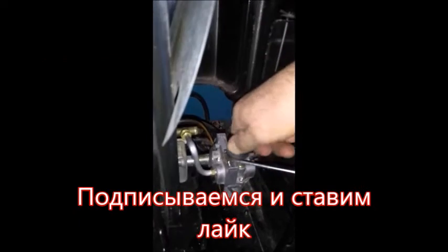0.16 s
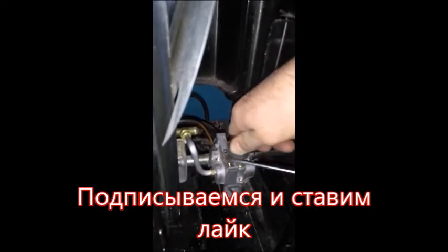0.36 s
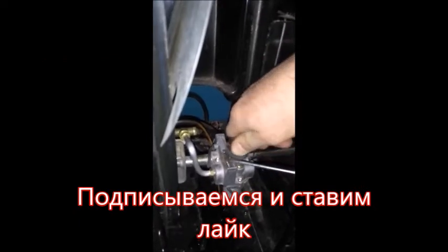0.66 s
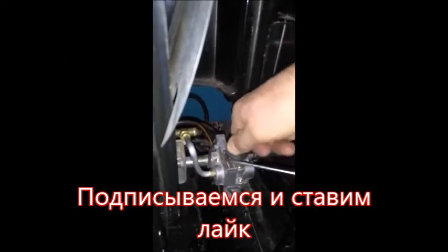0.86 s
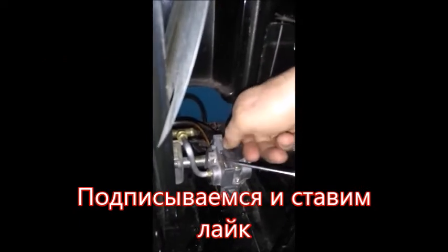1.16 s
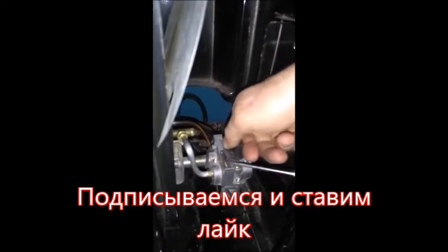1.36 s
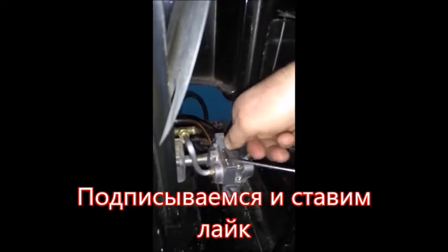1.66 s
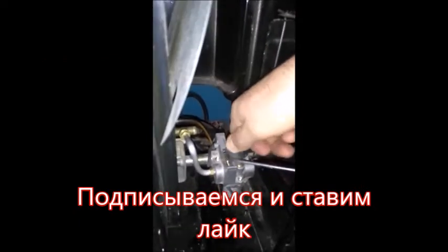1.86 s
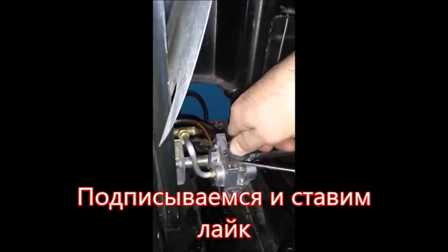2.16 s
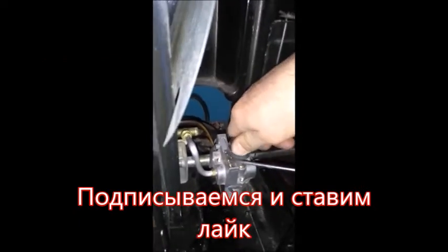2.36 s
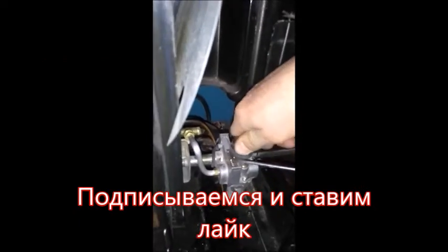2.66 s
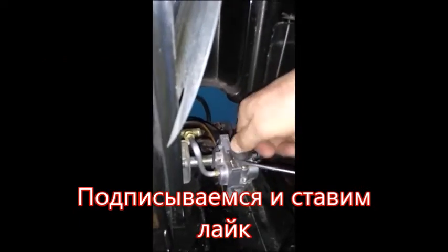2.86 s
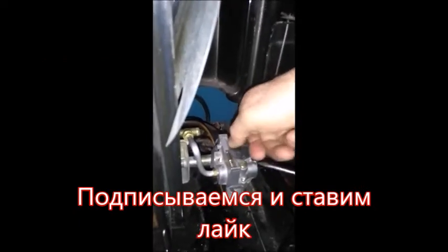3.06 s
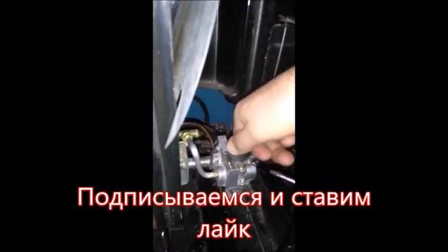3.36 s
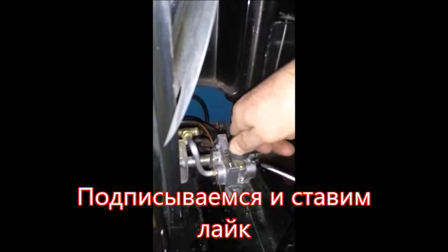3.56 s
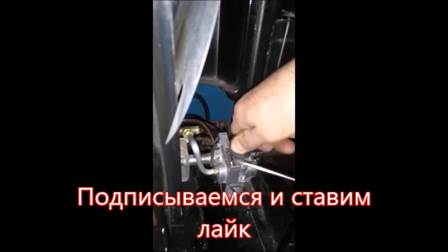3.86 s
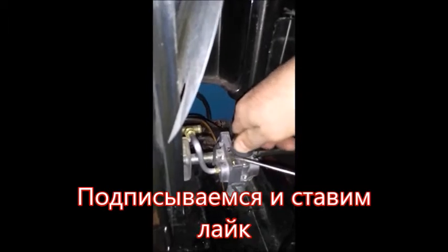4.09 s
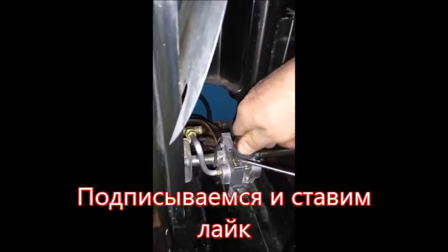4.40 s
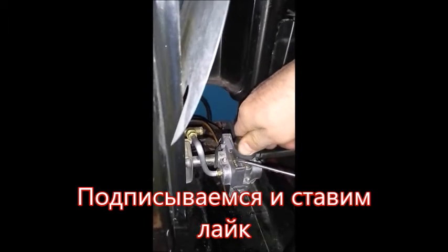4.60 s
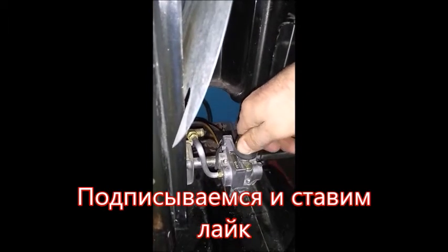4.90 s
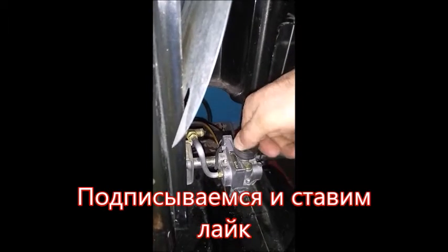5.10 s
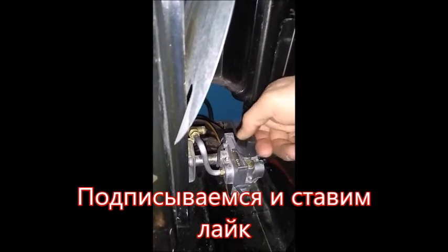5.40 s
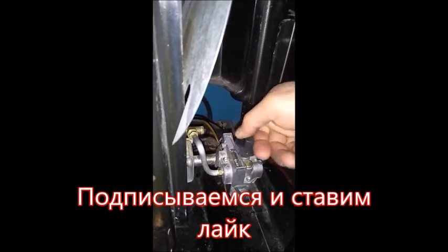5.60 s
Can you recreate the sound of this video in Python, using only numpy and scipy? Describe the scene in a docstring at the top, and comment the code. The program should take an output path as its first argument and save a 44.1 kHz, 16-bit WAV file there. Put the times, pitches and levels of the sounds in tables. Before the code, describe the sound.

A hand works a gas valve: three loud, thumping steel snaps, quieter return clicks between them, small ticks and scrapes, and faint hiss.

```python
"""The igniter of a gas valve snaps three times in a sheet-metal cabinet in a quiet room, as a thumb turns the valve.
Each snap is a swelling and fading burst of noise that rings steel parts, above a short low thump of air.
The button clicks back, the knob clacks, and fingers tick and rub: bursts and random grains excite decaying modes.
Blows also ring the cabinet; one part sings a clear tone. Held in, the valve hisses: noise with narrow resonances.
Room tone and microphone hiss are filtered noise."""
import sys
import numpy as np
from scipy import signal
from scipy.fft import rfft, irfft
from scipy.io import wavfile

SR = 44100
rng = np.random.default_rng(int(sys.argv[2]) if len(sys.argv) > 2 else 0)


def pcm_store(signal):
    """Save signal as 16-bit PCM."""
    levels = np.round(np.clip(np.atleast_2d(signal), -1, 1) * 32767)
    wavfile.write(sys.argv[1], SR, levels.astype(np.int16).T)


N = 253134

# Levels in the tables are relative: mixing gains and filters follow.
# Hammer snaps. Each row: blow in s, rattle in dB, blow into the cabinet in dB, thump in dB,
# swell of the rattle in s, fade t60 in s.
SNAPS = [(0.588, -11, -30.5, -9.5, 0.033, 0.058), (2.3954, -9, -28, -3, 0.029, 0.06),
         (4.3367, -11, -30, -6, 0.022, 0.081)]
# Button clicking back. Each row: blow in s, rattle in dB, blow into the cabinet in dB,
# swell of the rattle in s, fade t60 in s.
BUTTON_RETURNS = [(1.395, -19, -50.5, 0.012, 0.045), (3.123, -19.5, -49.5, 0.014, 0.0483)]
# Knob let go against its stop. Each row: blow in s, rattle in dB, blow into the cabinet in dB,
# swell in s, fade t60 in s.
KNOB_LET_GO = [(4.9953, -22, -36.5, 0.016, 0.16)]
# Small ticks of finger and parts. Each row: blow in s, bright level in dB, blow into the cabinet in dB,
# centre of the bright band in Hz, fade t60 in s.
TICKS = [(0.0638, -39, -73.5, 7600, 0.045), (0.1193, -46.5, -74.5, 6200, 0.038),
         (1.2944, -31, -70.5, 1620, 0.11), (1.5274, -53, -67, 1860, 0.064),
         (1.6177, -33.5, -71, 8560, 0.12), (1.9589, -35.5, -74, 7900, 0.022),
         (3.2922, -24, -49.5, 2337, 0.11), (3.3374, -39, -76, 10500, 0.068),
         (3.4207, -42.5, -66, 2280, 0.048), (3.565, -47.5, -51.5, 5200, 0.045),
         (3.6375, -41, -49.5, 2340, 0.053), (3.8878, -29, -55, 10300, 0.088),
         (4.2145, -33.5, -65, 8800, 0.077), (4.2577, -42, -84, 7040, 0.21), (5.7094, -40.5, -65, 1878, .05)]
# Brief narrow flares of the hiss near 5.9 kHz. Each row: peak in s, bright level in dB, blow into the cabinet
# in dB, # centre of the bright band in Hz, fade t60 in s.
HISS_FLARES = [(1.2100, -35, -66.5, 5930, 0.037), (2.8760, -31.5, -64.5, 5830, 0.073),
               (4.726, -33.5, -70, 5840, 0.13)]
# Strokes of the fingers rubbing and turning the knob. Each row: start in s, length in s, dull level in dB,
# bright level in dB, low panel level in dB.
RUBS = [(-.015, 0.013, -60.5, -53, -88), (0.073, 0.03, -62.5, -57, -69), (1.122, 0.1, -55.5, -83.5, -81),
        (1.187, 0.058, -52.5, -82, -60.5), (1.284, 0.017, -42, -95, -43), (1.358, 0.082, -49.5, -63, -73),
        (1.467, 0.12, -48.5, -58.5, -64), (1.538, 0.021, -46, -70, -77), (1.602, 0.027, -45.5, -64.5, -62),
        (1.69, 0.045, -60, -95, -79), (1.762, 0.011, -57.5, -101, -73), (3.282, 0.11, -48, -54, -57),
        (3.406, 0.19, -60, -52, -78.5), (3.544, 0.039, -50.5, -35.5, -64), (3.626, 0.045, -68, -35.5, -64),
        (3.655, 0.095, -45.5, -26.5, -48.5), (3.713, 0.12, -42.5, -33.5, -51),
        (3.865, 0.12, -53, -48.5, -65.5), (3.998, 0.016, -47.5, -46.5, -73), (4.21, 0.03, -59.5, -78, -59),
        (5.703, 0.038, -51, -77, -69)]
# Valve held in. Each row: start in s, length in s, gas flow in dB.
PRESSES = [(0.109, 1.2, -75), (1.802, 1.36, -74), (3.416, 1.58, -74)]
# One thin part rings on after blows until a hand damps it. Each row: start in s, ringing time in s, level in dB.
ROD_RINGS = [(2.399, 0.552, -55), (4.34, 0.565, -65), (5.0, 0.6, -68)]

# Smooth spectra of the exciting noises. Each row: frequency in Hz, spectral level in dB.
SNAP_COLOUR = [(880, -40.5), (1500, -3), (1710, -17.5), (1910, -15), (3840, -12.5), (4560, -4.5),
               (7440, -3.5), (9090, 4), (14000, 0.5), (15900, -6), (16400, -33.5)]
RETURN_COLOUR = [(880, -74), (1500, -35), (3620, -32.5), (5090, -20.5), (6600, -12), (7080, -1.5),
                 (7900, -24.5), (10100, -3), (12100, -20.5), (15600, -10.5), (16400, -28)]
LET_GO_COLOUR = [(350, -45), (600, -48.5), (1440, -7), (1970, -2), (4780, 5.5), (5490, -0.5), (8680, 11),
                 (14100, 2), (16400, -29)]
RUB_COLOUR = [(1000, -18), (1800, -5), (2350, -11), (3870, -21.5), (5000, -13), (5650, -9.5), (9420, -4.5),
              (14500, -18), (16400, -52)]
DULL_RUB_COLOUR = [(47, -75), (80, -17.5), (252, -8), (580, 0.5), (729, -9.5), (1020, -13.5), (1470, -18.5),
                   (1710, -30), (2410, -26.5), (4000, -27.5), (5200, -107), (8800, -120)]
# Spectra of the blows into the cabinet. Each row: frequency in Hz, spectral level in dB.
BLOW_COLOUR = [(47, -74.5), (80, -45.5), (333, -5.5), (680, -10), (920, 0), (1120, -14), (1700, -13.5),
               (3750, -17), (4860, -4.5), (7160, -17), (14000, -35.5)]
LET_GO_BLOW_COLOUR = [(59, -49), (100, -26), (250, -15), (320, -5), (487, -22.5), (1010, -17),
                      (1440, -11.5), (1690, -29), (4780, -12.5), (12000, -22), (15600, -69.5),
                      (22000, -120)]
# Spectra of gas hiss, room tone and microphone hiss. Each row: frequency in Hz, spectral level in dB.
GAS_HISS = [(2500, -32), (4500, -14), (7000, -2), (10000, 4), (15000, 2.5)]
ROOM_TONE = [(24, -82), (40, -61.5), (118, -5), (147, -6.5), (308, -11), (337, -15), (1310, -28),
             (1620, -32), (2020, -25.5), (3000, -39), (3900, -58), (6600, -120)]
MIC_HISS = [(1470, -36.5), (2500, -9.5), (2860, -3.5), (15200, -7.5), (16400, -5)]

# Whistles within the gas hiss. Each row: frequency in Hz, width of each filter pass in Hz, level in dB.
WHISTLES = [(5190, 150, -4), (6080, 380, 0), (6700, 300, -10), (8300, 500, -9), (9680, 350, -5),
            (14000, 600, -17)]
# Modes of the sheet-metal panels. Each row: frequency in Hz, level in dB, t60 before hand damping in s.
PANEL_MODES = [(262.4, -8.5, 1), (389.4, -13.5, 0.13), (406, -15.5, 0.3), (508.4, -5.5, 1), (598, -10, 0.9),
               (784, -14, 0.96), (825, -8.5, 0.095), (983.2, -4, 0.31), (1002, -5.5, 0.97),
               (1053, -7.5, 0.89), (1116, -8, 0.6), (1502, 1.5, 0.48), (1582, -1.5, 0.55), (1877, -9.5, 1),
               (1861, 1, 0.5), (1880, -10, 0.072), (2510, -14.5, 0.14), (2540, -15, 0.3),
               (2815, -8.5, 0.55), (3190, -13, .25), (3160, -10.5, 0.78), (4280, -8.5, .2), (2850, -7, 1)]
# Modes of the igniter's steel parts. Each row: frequency in Hz, level in dB, t60 before hand damping in s.
IGNITER_MODES = [(2400, -8, .15), (2900, -7, .13), (3350, -9, .2), (4130, -5, .15), (4500, -2, .12),
                 (4690, 1, .22), (4980, -6, .35), (5160, 0, .15), (5430, -8, .27), (5820, -6, .18),
                 (6750, -9, .16), (8300, -10, .3), (8830, -6, .14), (9300, -9, .14), (9780, -5, .32),
                 (10900, -9, .25), (11500, -10, .2), (12700, -4, .26), (13200, -4, .28), (13750, -3, .28),
                 (14890, -9, .14)]
# Modes of the knob. Each row: frequency in Hz, level in dB, t60 before damping in s.
KNOB_MODES = [(319.5, -17.5, 0.9), (825, -12, 0.46), (1191, 8.5, 0.48), (1468, 4.5, 0.74), (2388, 6, 0.51),
              (2550, -3.5, 0.77), (2993, -0.5, 0.3), (3470, -4.5, 0.41), (3870, 3.5, 0.21),
              (4820, -4.5, 0.3), (4942, 0.5, 0.3), (5027, -4.5, 0.53), (6260, 2, 0.22), (7230, 4, 0.14),
              (8500, -14.5, 0.23), (8674, 0, 0.086), (9350, -12.5, .15)]
# Decay of the dense ringing of cabinet and room. Each row: frequency in Hz, t60 in s.
CABINET_DECAY = [(100, 1), (300, 0.97), (600, 1), (1200, 0.82), (2500, 0.51), (5000, 0.27), (9000, 0.27),
                 (15000, 0.093)]
EDGES_HZ = 45 * 2 ** np.arange(0, 8.7, 1 / 3)   # third-octave band edges

SWELL_DB = 20.5   # the swell of a burst starts this far under its top
BLOW_SWELL_S, TICK_SWELL_S, FLARE_SWELL_S = 0.02, 0.02, 0.048
TAIL_T60_S, TAIL_DB = 0.45, -34.5   # dense bright tail of the igniter
THUMP_HZ, THUMP_T60_S, THUMP_LOW_HZ = 237, 0.0068, 105
RUB_ATTACK_S = 0.012
DULL_FADE_DB_PER_S, BRIGHT_FADE_DB_PER_S, PANEL_FADE_DB_PER_S = 125, 194, 164.5
LOW_PANEL_HZ, LOW_PANEL_WIDTH_HZ = 255, 18   # width of each of two filter passes
ROD_HZ, ROD_ATTACK_S, ROD_WAVER_DB = 1044, 0.044, 2
ROD_SAG_DB_PER_S, ROD_DAMPED_DB_PER_S = 10, 248.5
GAS_HISS_DB, VALVE_OPEN_S, VALVE_SHUT_DB_PER_S = -4, 0.04, 394   # hiss level is relative to the flow
ROOM_DB, MIC_HISS_DB = -73, -81
# stereo width: the difference between the two channels
TREBLE_SIDE_HZ, TREBLE_SIDE_DB, THUMP_SIDE_DB, ROOM_SIDE_DB = 5800, -4, -33, -6.5
SNAP_SIDE_DB, SNAP_SIDE_HZ = -27.5, 900
MIC_LOW_HZ, CUTOFF_HZ = 137.5, 16800


def igniter():
    """Impact excitation: bright rattles of spring and hammer ring steel modes, drawn anew for each snap."""
    rattles = [coloured(bursts([row], column=1), SNAP_COLOUR) for row in SNAPS]
    bright = sum(rattles) + coloured(bursts(BUTTON_RETURNS, column=1), RETURN_COLOUR)

    steel = 0
    for rattle in rattles:
        parts = modes(IGNITER_MODES, spread_db=3, split=.014, count=9, size=SR // 3)
        steel = steel + through(rattle, parts)
    # first ring under the thumb, strongly damped
    under_thumb = modes(IGNITER_MODES, spread_db=3, split=.008, damping=5, count=3, size=SR // 10)
    clank = through(bright, under_thumb)

    t = np.arange(SR // 3) / SR
    dense = rng.standard_normal(SR // 3) * from_db(-60 * t / TAIL_T60_S)
    tail = through(bright, dense / np.sqrt(np.sum(dense ** 2)))

    steel_gain = from_db(-19 + 1.4 * drift(27))
    return from_db(-4.5) * bright + from_db(-12) * clank + steel_gain * steel + from_db(TAIL_DB) * tail


def thump():
    """Impulsive radiation: each hammer blow pushes the air once, as a low, quickly damped sine."""
    push = np.zeros(N)
    for row in SNAPS:
        push[round((row[0] - .001) * SR)] = from_db(row[3])
    push = signal.lfilter(*signal.butter(2, THUMP_LOW_HZ, "high", fs=SR), push + 1e-18)
    t = np.arange(SR // 5) / SR
    return through(push, from_db(-60 * t / THUMP_T60_S) * np.sin(2 * np.pi * THUMP_HZ * t))


def knob():
    """Modal excitation: a clack and ticks ring the knob; rubbing is random slips in damped steel parts."""
    clack = from_db(-9.5) * coloured(bursts(KNOB_LET_GO, column=1), LET_GO_COLOUR)
    body = modes(KNOB_MODES, spread_db=2, split=.013, damping=1.15, count=9, size=SR // 2)
    ring = from_db(10 + 2 * drift(27.2)) * through(clack, body)

    ticks = from_db(-12) * bursts(TICKS, column=1, width=0.22, swell=TICK_SWELL_S)
    ticks = ticks + from_db(-1) * through(ticks, body)
    flares = from_db(-9) * bursts(HISS_FLARES, column=1, width=0.033, swell=FLARE_SWELL_S)

    slips = from_db(2 * drift(60)) * grains(per_s=7000, uneven_db=3.5)
    rub = strokes(column=3, fade_db_per_s=BRIGHT_FADE_DB_PER_S) * coloured(slips, RUB_COLOUR)
    # fingers damp the parts they rub
    held_parts = modes(IGNITER_MODES + KNOB_MODES, spread_db=3, split=.012, damping=3, size=SR // 4)
    rasp = from_db(-18.5) * rub + from_db(-10) * through(rub, held_parts)
    return clack + ring + ticks + flares + patchy(rasp, depth_db=2, rate=12)


def sheet_metal():
    """Forced plate vibration: blows set the cabinet ringing; rubs drive its panels, damped by the hand."""
    taps = bursts(TICKS + HISS_FLARES, column=2, swell=TICK_SWELL_S)
    snaps = bursts(SNAPS + BUTTON_RETURNS, column=2, swell=BLOW_SWELL_S)
    blows = coloured(snaps + taps, BLOW_COLOUR)
    blows += coloured(bursts(KNOB_LET_GO, column=2), LET_GO_BLOW_COLOUR)
    ringing = from_db(10) * through(blows, cabinet(panels_db=-2))

    slips = coloured(grains(per_s=4000, uneven_db=3.5), DULL_RUB_COLOUR)
    held_panels = modes(PANEL_MODES, spread_db=2, split=.02, damping=3, size=SR // 4)
    driven = slips + from_db(4) * rms_one(through(slips, held_panels))
    rubbed = from_db(-5) * strokes(column=2, fade_db_per_s=DULL_FADE_DB_PER_S) * driven
    return patchy(ringing + rubbed * from_db(1.5 * drift(20)), depth_db=2, rate=16)


def low_panel():
    """Narrow-band resonance: the largest panel hums under the strokes, as noise twice through one peak."""
    hum = rms_one(resonated_twice(LOW_PANEL_HZ, LOW_PANEL_WIDTH_HZ))
    return strokes(column=4, fade_db_per_s=PANEL_FADE_DB_PER_S) * hum


def rod():
    """A lightly damped single mode: a thin part sounds one clear sine that wavers a little."""
    gain = held_level(*np.transpose(ROD_RINGS), ROD_ATTACK_S, ROD_DAMPED_DB_PER_S, ROD_SAG_DB_PER_S)
    gain = gain * from_db(ROD_WAVER_DB * drift(11))
    return np.sqrt(2) * gain * np.sin(2 * np.pi * ROD_HZ * np.arange(N) / SR)


def gas():
    """Flow noise: a smooth hiss, with whistles made as noise twice through each narrow resonance."""
    out = from_db(GAS_HISS_DB + 2 * drift(5.5)) * coloured(rng.standard_normal(N), GAS_HISS)
    for hz, width_hz, level_db in WHISTLES:
        waver_db = 3 * drift(14) + .7 * drift(2)
        out += from_db(level_db + waver_db) * rms_one(resonated_twice(hz, width_hz))
    return out * held_level(*np.transpose(PRESSES), VALVE_OPEN_S, VALVE_SHUT_DB_PER_S)


def floor():
    """Stationary background noise: uneven low room tone and smooth microphone hiss."""
    room = from_db(ROOM_DB + 0.37 * drift(7.9)) * coloured(rng.standard_normal(N), ROOM_TONE)
    return room + from_db(MIC_HISS_DB + 1.5 * drift(5)) * coloured(rng.standard_normal(N), MIC_HISS)


def cabinet(panels_db):
    """Frequency-dependent decay: third-octave noise dies band by band, plus the clearest panel modes."""
    t = np.arange(SR) / SR
    white = rng.standard_normal((2, SR))   # neighbouring bands take different noises
    out = 0
    for k, (low, high) in enumerate(zip(EDGES_HZ, EDGES_HZ[1:])):
        band = signal.sosfilt(signal.butter(2, [low, high], "band", fs=SR, output="sos"), white[k % 2])
        t60 = at_hz(CABINET_DECAY, np.sqrt(low * high))
        out = out + band * from_db(-60 * t / t60)
    out = rms_one(out) / np.sqrt(SR)   # unit energy
    out[:SR * 3 // 4] += from_db(panels_db) * modes(PANEL_MODES, spread_db=2, split=.009)
    return out


def modes(table, spread_db, split, damping=1, count=4, size=SR * 3 // 4):
    """Modal superposition: each mode is a cluster of close decaying sines that beat; unit energy in all."""
    t = np.arange(size) / SR
    hz, level_db, t60 = np.repeat(table, count, axis=0).T[:, :, None]
    hz = hz * (1 + split * rng.standard_normal(hz.shape))
    level_db = level_db + spread_db * rng.standard_normal(hz.shape)
    decay_db = 60 * t * damping / np.clip(t60, .01, 1.1)
    ringing = np.sum(from_db(level_db - decay_db) * np.sin(2 * np.pi * hz * t), axis=0)
    return ringing / np.sqrt(np.sum(ringing ** 2))


def burst(s, level_db, swell, fade):
    """Noise burst: noise swells for some ms to a peak and fades; gives (first sample, sound)."""
    swell, fade = max(swell, .002), max(fade, .005)
    t = np.arange(SR // 4) / SR - swell   # zero at the peak
    onset = np.clip((t + swell) / 0.0092, 0, 1) ** 2
    below_top_db = np.maximum(-SWELL_DB * t / swell, 60 * t / fade)
    envelope = onset * from_db(level_db - below_top_db)
    return round((s - swell) * SR), envelope * rng.standard_normal(len(t))


def bursts(rows, column, width=None, swell=None):
    """Superposition of a table's blows; a relative width gives each its own resonant band."""
    out = np.zeros(N + SR)
    for row in rows:
        at, sound = burst(row[0], row[column], swell or row[-2], row[-1])
        if width:
            sound = signal.lfilter(*signal.iirpeak(row[3], 1 / width, fs=SR), sound)
        out[at:at + len(sound)] += sound
    return out[:N]


def grains(per_s, uneven_db):
    """Stick-slip friction as random impulses of uneven size and either sign; unit power."""
    sizes = from_db(uneven_db * np.minimum(rng.exponential(1, N), 4))
    signs = rng.choice([-1, 1], N)
    return rms_one(sizes * signs * (rng.random(N) < per_s / SR))


def strokes(column, fade_db_per_s):
    """Amplitude modulation: the gain of the rubbing over time."""
    rows = np.transpose(RUBS)
    return held_level(rows[0], rows[1], rows[column], RUB_ATTACK_S, fade_db_per_s)


def held_level(start, length, level_db, attack, fade_db_per_s, sag_db_per_s=0):
    """Envelope of sustained events: each rises, holds or sags, then fades; the loudest one counts."""
    steps = np.arange(0, N + 32, 32)
    t = steps / SR - np.array(start)[:, None]
    after = np.maximum(t - np.array(length)[:, None], 0)
    db = np.array(level_db)[:, None] - sag_db_per_s * t - fade_db_per_s * after
    gain = np.clip(t / max(attack, .002), 0, 1) ** 2 * from_db(np.minimum(db, 0))
    return np.interp(np.arange(N), steps, gain.max(axis=0))


def patchy(x, depth_db, rate):
    """Random band gains: every third-octave swells and sinks alone."""
    out = 0
    for edges in zip(EDGES_HZ, EDGES_HZ[1:]):
        band = signal.butter(2, edges, "band", fs=SR, output="sos")
        out = out + signal.sosfilt(band, x) * from_db(depth_db * drift(rate))
    return out


def drift(rate):
    """Low-passed chance: slow noise of unit spread with a corner in Hz, drawn at every 16th sample."""
    r = np.exp(-32 * np.pi * rate / SR)
    slow = signal.lfilter([1], [1, -2 * r, r * r], rng.standard_normal(N // 16 + 3002))
    slow = slow[3000:]   # settled part
    return np.interp(np.arange(N) / 16, np.arange(len(slow)), rms_one(slow))


def resonated_twice(hz, width_hz):
    """Resonance in cascade: white noise passes twice through the same peak."""
    b, a = signal.iirpeak(hz, hz / width_hz, fs=SR)
    return signal.lfilter(b, a, signal.lfilter(b, a, rng.standard_normal(N)))


def coloured(x, spectrum):
    """Linear filtering by a smooth spectrum; white noise keeps its power."""
    hz = np.maximum(np.arange(N // 2 + 1) * SR / N, 1)
    return irfft(rfft(x) * rms_one(from_db(at_hz(spectrum, hz))), N)


def through(x, response):
    """Convolution with an impulse response, cut to length."""
    return signal.fftconvolve(x, response)[:N]


def at_hz(points, hz):
    """Interpolation of a table on a logarithmic frequency axis."""
    points = np.array(points)
    return np.interp(np.log(hz), np.log(points[:, 0]), points[:, 1])


def rms_one(x):
    """Normalisation to unit mean power."""
    return x / np.sqrt(np.mean(x ** 2) + 1e-20)


def from_db(db):
    """The decibel law: amplitude gain of a level."""
    return 10 ** (np.asarray(db) / 20)


def scene():
    """Mid-side stereo: width lies in treble and room, with a little low sound at the snaps."""
    push = thump()
    near = igniter() + rod() + knob() + sheet_metal() + low_panel() + gas()

    # two random echo patterns, mixed in slowly varying shares
    echoes = rng.standard_normal((2, 700)) * from_db(-60 * np.arange(700) / 900) / 8
    turn = 3 * drift(4)
    echoed = np.cos(turn) * through(near, echoes[0]) + np.sin(turn) * through(near, echoes[1])
    treble = signal.sosfilt(signal.butter(10, TREBLE_SIDE_HZ, "high", fs=SR, output="sos"), echoed)

    low_pass = signal.butter(4, SNAP_SIDE_HZ, fs=SR, output="sos")
    low_noise = signal.sosfilt(low_pass, bursts(SNAPS, column=3))

    side = from_db(TREBLE_SIDE_DB) * treble + from_db(ROOM_SIDE_DB) * floor()
    side += from_db(THUMP_SIDE_DB) * (push - np.roll(push, 30)) + from_db(SNAP_SIDE_DB) * low_noise
    mid = near + push + floor()
    return np.array([mid + side, mid - side])


def record(dry):
    """Band limiting: the microphone weakens the deep bass, and the top is cut."""
    thin = signal.sosfilt(signal.butter(4, MIC_LOW_HZ, "high", fs=SR, output="sos"), dry)
    top_cut = signal.cheby2(12, 70, CUTOFF_HZ, fs=SR, output="sos")
    return signal.sosfilt(top_cut, thin + from_db(-28.5) * (dry - thin))


dry = scene()
out = record(dry)
pcm_store(out)
```